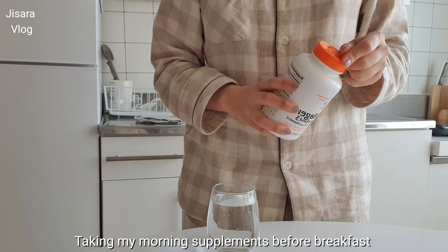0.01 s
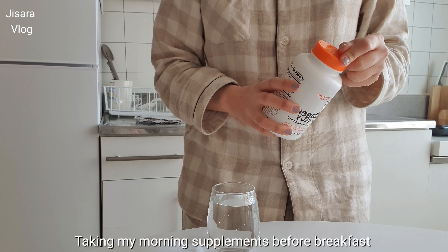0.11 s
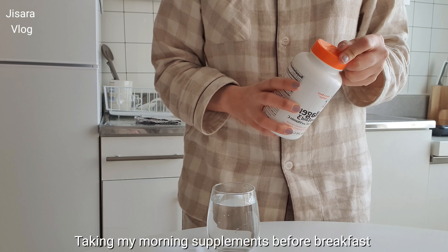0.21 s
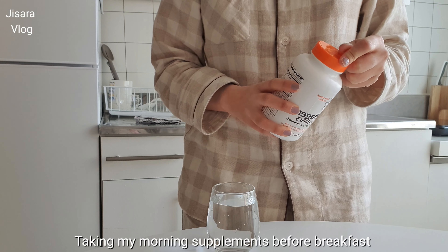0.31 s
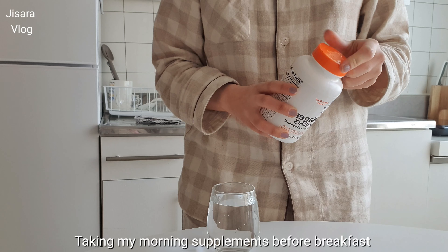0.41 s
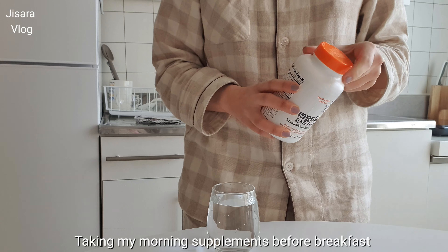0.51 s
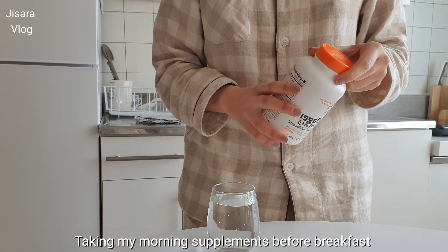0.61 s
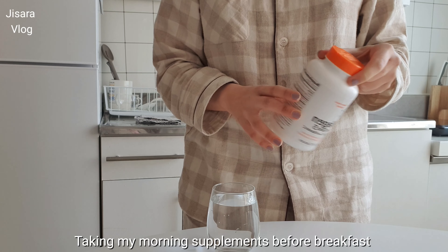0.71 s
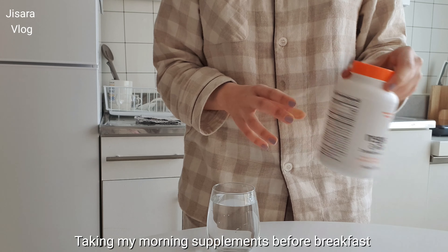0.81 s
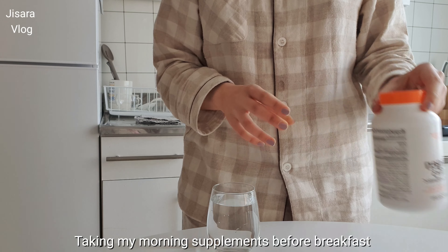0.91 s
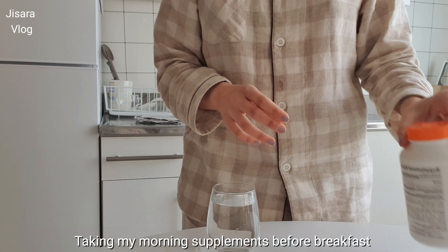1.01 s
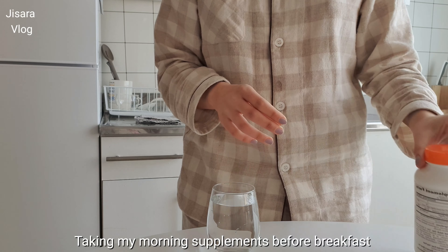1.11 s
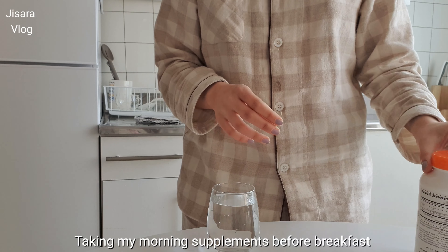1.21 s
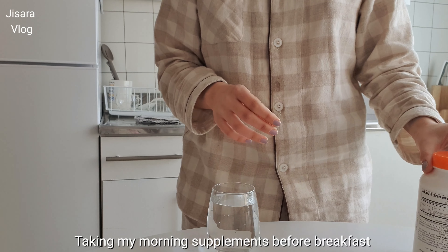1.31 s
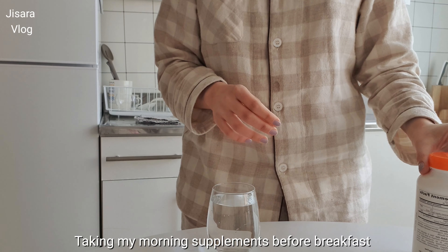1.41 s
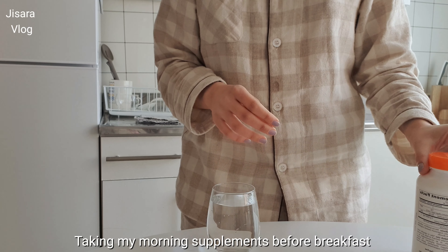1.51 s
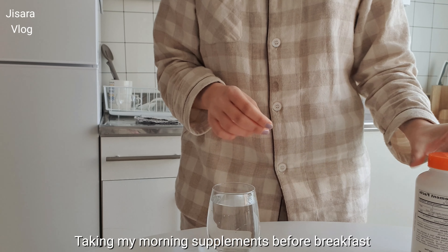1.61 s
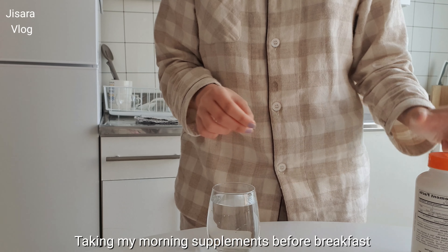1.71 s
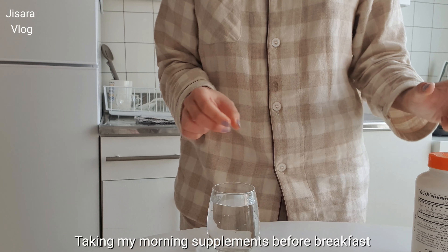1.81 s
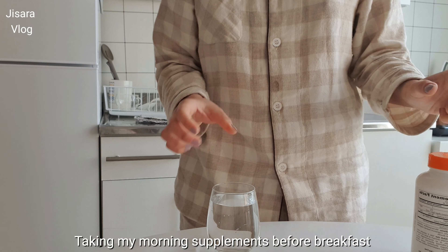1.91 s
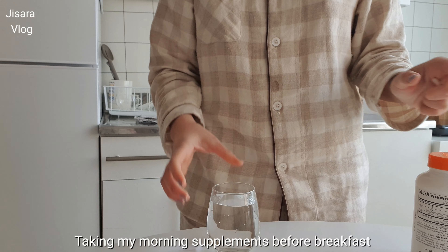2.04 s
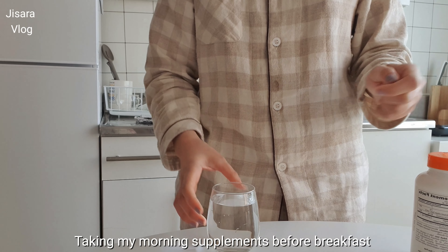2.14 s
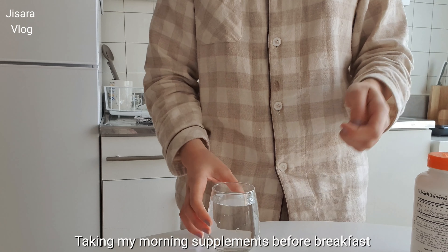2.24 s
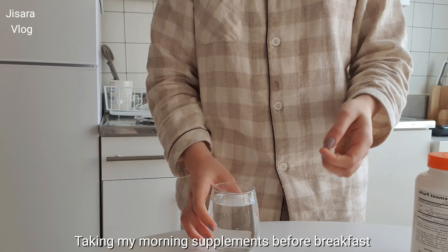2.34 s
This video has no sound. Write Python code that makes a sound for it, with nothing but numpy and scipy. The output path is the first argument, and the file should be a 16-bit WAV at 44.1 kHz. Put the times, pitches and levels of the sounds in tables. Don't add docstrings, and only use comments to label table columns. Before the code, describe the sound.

Pill bottle handling: sharp cap click, quick tumble of tablets, then a knock onto a table.

```python
import sys
import numpy as np
from scipy import signal
from scipy.fft import rfft, irfft
from scipy.io import wavfile

SR = 44100
rng = np.random.default_rng(int(sys.argv[2]) if len(sys.argv) > 2 else 0)


def wrap_up_sound(samples):
    columns = np.atleast_2d(samples).T
    tamed = np.clip(columns, -1, 1)
    steps = np.round(tamed * 32767).astype(np.int16)
    wavfile.write(sys.argv[1], SR, steps)


def to_linear_factor(level_db):
    exponent = np.asarray(level_db, float) / 20
    return 10 ** exponent


N = 105840


def rms_one(x):
    return x / np.sqrt(np.mean(x ** 2) + 1e-20)


def at_hz(rows, hz, column):
    rows = np.array(rows)
    return np.interp(np.log(hz), np.log(rows[:, 0]), rows[:, column])


def band(x, low_hz, high_hz):
    sos = signal.butter(2, [low_hz, min(high_hz, SR / 2.1)], "band", fs=SR, output="sos")
    return signal.sosfilt(sos, x)


def soften(x, cutoff_hz):
    return signal.sosfilt(signal.butter(2, min(cutoff_hz, SR / 2.1), fs=SR, output="sos"), x)


def strike(modes, s, db, tilt_db, scatter_db):
    out = np.zeros(N)
    at = (np.asarray(s) * SR).astype(int)
    luck = rng.standard_normal((len(at), len(modes)))
    signs = (-1.) ** np.arange(len(at))
    for k, (hz, level_db, t60_s) in enumerate(modes):
        octaves = max(np.log2(hz / 1200), 0)
        hit_db = db + level_db + tilt_db * octaves + scatter_db * luck[:, k]
        clicks = np.full(N, 1e-18)
        np.add.at(clicks, at, to_linear_factor(hit_db) * signs)
        decay = to_linear_factor(-60 / (t60_s * SR))
        w = 2 * np.pi * hz / SR
        resonator = [1, -2 * decay * np.cos(w), decay * decay]
        out += signal.lfilter([0, np.sin(w) * (-1) ** k], resonator, clicks)
    return signal.lfilter([.25, .5, .25], [1], out)


def crack(s, db, spectrum):
    hz = np.arange(1, 2050) * SR / 4096
    cepstrum = irfft(np.log(to_linear_factor(at_hz(spectrum, hz, column=1))))
    cepstrum[1:2048] *= 2
    pulse = irfft(np.exp(rfft(cepstrum[:2048], 4096)))[:2048]
    out, start = np.zeros(N), int(s * SR)
    out[start:start + len(pulse)] = to_linear_factor(db) * pulse / np.abs(pulse).max()
    return out


def stereo_bands(size, gain, alike, lowest_hz):
    out = 0
    edges_hz = lowest_hz * 2 ** np.arange(0, np.log2(18000 / lowest_hz), .5)
    white = rng.standard_normal((2, 2, size))
    for k, (low_hz, high_hz) in enumerate(zip(edges_hz, edges_hz[1:])):
        mid, side = band(white[k % 2], low_hz, high_hz)
        hz = np.sqrt(low_hz * high_hz)
        c = np.clip(alike(hz), 0, 1)
        out = out + gain(hz) * (np.sqrt(1 + c) * mid + np.sqrt(1 - c) * side * [[1], [-1]])
    return out


def cap_snap():
    # start in seconds, level in dB.
    snap_contacts = [
        (0.2332, -28.5),
        (0.2346, -18),
    ]
    # frequency in Hz, level in dB, t60 in seconds.
    shell_modes = [(305, 0, 0.014), (1250, -1.5, 0.0087), (2730, -4, .013), (4957, -6.5, .005),
                   (7450, -13.5, 0.0015), (10100, -3, 0.0027), (14000, -12, .002)]
    # frequency in Hz, density in dB per Hz.
    snap_spectrum = [(60, -28.5), (140, -5), (320, -2), (1200, -4), (2100, -11), (2800, -6.5),
                     (4500, -17.5), (16000, -33.5)]
    ring = -strike(shell_modes, *np.transpose(snap_contacts), tilt_db=0, scatter_db=0)
    return ring, crack(snap_contacts[1][0], -18.5, snap_spectrum)


def tablets():
    # frequency in Hz, level in dB, t60 in seconds.
    bottle_modes = [(319.8, -21.5, .01), (480, -14, 0.037), (795, -6, 0.0089), (1136, 1, 0.021),
                    (1600, -7, 0.018), (1850, -10.5, 0.0078), (2836, -5.5, 0.017), (3363, -10, 0.01),
                    (3725, -7, 0.01), (4450, -11, 0.013), (5470, -13.5, 0.0057), (9240, -11, 0.0013),
                    (12100, -21, 0.002)]
    # time in seconds, level in dB.
    swing = [
        (.84, -81.5),
        (0.881, -59.5),
        (0.922, -48.5),
        (0.956, -37),
        (.99, -46.5),
        (1.04, -54.5),
        (1.069, -60.5),
        (1.2, -87),
    ]
    # start in seconds, level in dB, brightness in dB per octave.
    knocks = [
        (.9, -60, 8),
        (.952, -52.5, 10.7),
        (0.9614, -56.5, 12.5),
        (1.01, -52, 8),
        (1.043, -52, 4.7),
        (1.044, -52.5, 7),
        (1.477, -68, -1.5),
    ]
    # start in seconds, level in dB.
    thuds = [(0.136, -64), (.922, -44.5), (.934, -50), (0.94, -48), (0.945, -39.5), (0.9653, -28),
             (0.974, -49), (.985, -42), (1.043, -42.5), (1.115, -57), (1.202, -63.5)]
    swing_s, swing_db = np.transpose(swing)
    s = swing_s[0] + np.sort(rng.random(600)) * (swing_s[-1] - swing_s[0])
    spread_db = 2 * np.minimum(rng.exponential(1, len(s)), 2.5)
    db = np.interp(s, swing_s, swing_db) - 18.5 + spread_db
    hits = strike(bottle_modes, s, db, tilt_db=.6, scatter_db=8.5)
    hits = hits + strike(bottle_modes, *np.transpose(knocks), scatter_db=3.0)
    heaps = strike(bottle_modes, *np.transpose(thuds), tilt_db=-6, scatter_db=5.5)
    heaps = soften(soften(heaps, cutoff_hz=2170), cutoff_hz=2170)
    return soften(hits, cutoff_hz=11300) + heaps


def table_landing():
    # start in seconds, level in dB.
    landing_contacts = [
        (1.3434, -31),
        (1.3449, -29),
        (1.575, -55),
    ]
    # frequency in Hz, level in dB, t60 in seconds.
    table_modes = [(60, -20.5, 0.34), (97.2, -4.5, 0.42), (123, -6, .15), (155.9, -11, 0.27),
                   (178.8, -13.5, 0.42), (222.1, -8, 0.22), (267.4, -9.5, 0.31), (298, -13.5, 0.32),
                   (355, -17, 0.04), (455.6, -6.5, 0.2), (627, -13.5, 0.066), (776, -8.5, 0.1),
                   (3120, -5, 0.0087), (8650, -12, 0.0022)]
    # frequency in Hz, density in dB per Hz.
    slap_spectrum = [(300, -3), (520, -1), (1000, -9), (1750, -18), (2400, -10.5), (4500, -33.5),
                     (9500, -41.5), (16000, -53)]
    # frequency in Hz, level in dB, t60 in seconds.
    rim_modes = [(1290, 2.5, 0.0091), (2940, 2.5, 0.016), (4870, -5.5, 0.0023), (8900, -2.5, 0.0043)]
    table = strike(table_modes, *np.transpose(landing_contacts), tilt_db=0, scatter_db=0)
    slap = crack(landing_contacts[0][0], -29.5, slap_spectrum)
    rim = strike(rim_modes, [1.2815], -57, tilt_db=0, scatter_db=0)
    return table, slap, rim


def skin():
    # start in seconds, length in seconds, level in dB.
    slides = [
        (0.655, 0.023, -76.5),
        (0.695, 0.069, -80),
        (1.581, 0.00071, -59),
        (1.757, 0.0011, -80),
    ]
    t, white = np.arange(N) / SR, rng.standard_normal(N)
    shape = np.zeros(N)
    for s, length_s, db in slides:
        swell = np.sin(np.pi * np.clip((t - s) / length_s, 0, 1)) ** .5
        shape += to_linear_factor(db) * swell * (t < s + length_s)
    hiss = white * shape
    return 3 * band(hiss, 8300, 10300) + to_linear_factor(-7) * band(hiss, 2200, 13000)


def from_right(x, lag_ms, shadow_db):
    hz = np.arange(N // 2 + 1) * SR / N
    shade = to_linear_factor(shadow_db / 2 / (1 + (2500 / (hz + 1)) ** 2))
    lag = np.exp(-2j * np.pi * hz * lag_ms / 1000)
    return np.array([irfft(rfft(x) * shade * lag, N), irfft(rfft(x) / shade, N)])


def kitchen(x):
    # frequency in Hz, t60 in seconds, level in dB, left-right likeness 0 to 1.
    room_bands = [(81.4, 0.3733, 2.5, .95), (248.8, 0.4, -4, 0.95), (686.7, 0.49, -5, .3),
                  (1560, 0.44, 1, 0.015), (3000, 0.4, -3, .1), (6000, 0.35, 1, 0.047),
                  (10000, .32, 2.5, 0.026), (14800, .24, 2.5, 0)]
    first_echo_s, rise_s = .003, .007
    t = np.arange(int(.9 * SR)) / SR

    def decay(hz):
        return to_linear_factor(at_hz(room_bands, hz, column=2) - 60 * t / at_hz(room_bands, hz, column=1))

    tail = stereo_bands(len(t), decay, lambda hz: at_hz(room_bands, hz, column=3), lowest_hz=40)
    tail = tail * np.clip((t - first_echo_s) / rise_s, 0, 1)
    tail = tail / np.sqrt(np.sum(tail ** 2) / 2)
    return signal.fftconvolve(tail, x[None], axes=1)[:, :N]


def refrigerator():
    # time in seconds, level in dB.
    drone_levels = [(0, -77), (.15, -63.5), (.4, -64.5), (.6, -66), (.8, -70.5), (.9, -56.5), (1.08, -61),
                    (1.2, -74.5), (1.5, -64), (1.65, -66.5), (1.8, -75), (2.0, -62), (2.22, -65),
                    (2.25, -70), (2.4, -73)]
    t, white = np.arange(N) / SR, rng.standard_normal((3, N + SR))
    wobble = rms_one(band(white[0], 49, 71)[SR:])
    tone = .8 * wobble + .8 * np.sin(2 * np.pi * 60 * t)
    mid, side = rms_one(band(white[1:], 20, 95)[:, SR:])
    rumble = to_linear_factor(-72.5) * (mid + .4 * side * np.array([[1], [-1]]))
    return to_linear_factor(np.interp(t, *np.transpose(drone_levels))) * rms_one(tone) + rumble


def hush():
    # frequency in Hz, density in dB per Hz.
    air_spectrum = [(53, -32), (90, 0), (151, -7.5), (266, -18.5), (310, -29.5), (419, -20), (998, -26),
                    (2230, -29.5), (16000, -43)]
    # frequency in Hz, left-right likeness 0 to 1.
    air_alike = [(100, 0), (500, 0.046), (2000, 0), (10000, 0.026)]
    air = stereo_bands(N, lambda hz: to_linear_factor(at_hz(air_spectrum, hz, column=1)),
                       lambda hz: at_hz(air_alike, hz, column=1), lowest_hz=80)
    return to_linear_factor(-73.5) * rms_one(air)


def scene():
    cap, snap = cap_snap()
    pills, slip = tablets(), skin()
    table, slap, rim = table_landing()
    direct = from_right(cap + snap, lag_ms=.072, shadow_db=-6)
    direct = direct + from_right(table + slap + rim, lag_ms=.22, shadow_db=-13)
    direct = direct + from_right(pills, lag_ms=.13, shadow_db=-6.5)
    direct = direct + from_right(slip, lag_ms=.1, shadow_db=-6.5)
    wall_echo_s = .0085
    echo = to_linear_factor(-4.5) * np.roll(band(cap + snap + pills, 680, 6000), int(wall_echo_s * SR))
    send = to_linear_factor(-15) * cap + to_linear_factor(12.5) * snap + to_linear_factor(-7) * pills + to_linear_factor(-5) * slip
    send = send + to_linear_factor(-7) * table + to_linear_factor(14) * slap + to_linear_factor(-1) * rim
    wet = kitchen(send) * to_linear_factor([[-.6], [.6]])
    return direct + echo + wet + hush() + refrigerator()


def low_pass(x):
    return signal.sosfilt(signal.butter(12, 16840, fs=SR, output="sos"), x)


def record(dry):
    t = np.arange(N) / SR
    x = dry - .6 * signal.lfilter(*signal.iirpeak(7560, 8.0, fs=SR), dry)
    dropout = (t > 1.8558) & (t < 1.8694)
    x = x * np.where(dropout, to_linear_factor(-22), 1)
    return low_pass(x)


dry = scene()
out = record(dry)
wrap_up_sound(out)
```